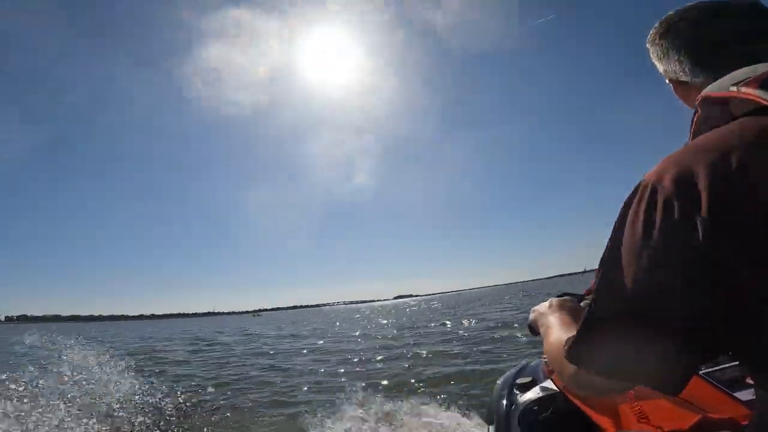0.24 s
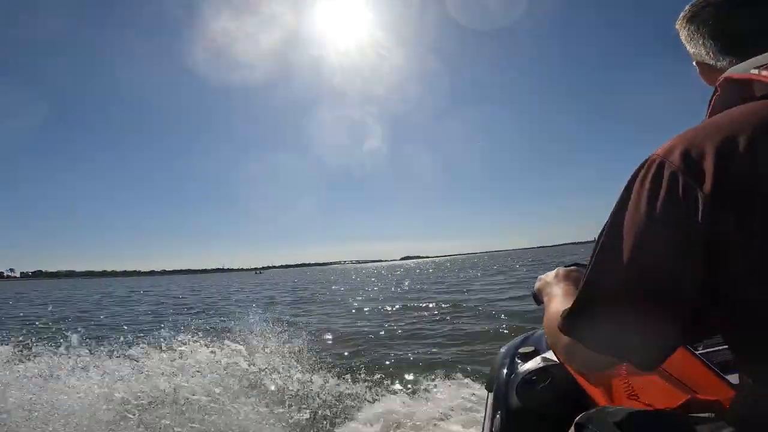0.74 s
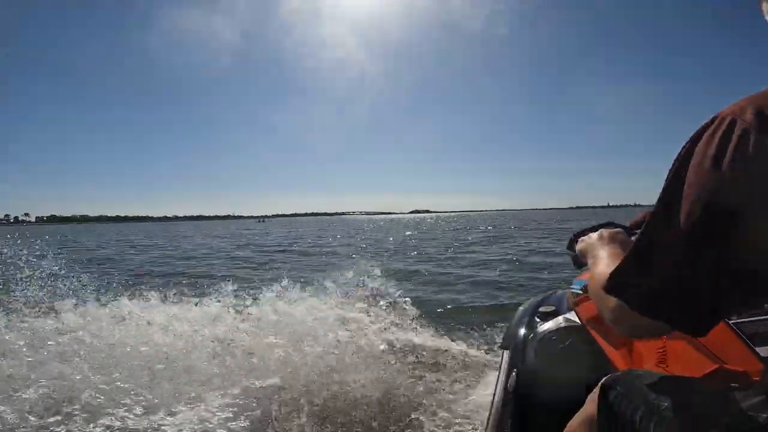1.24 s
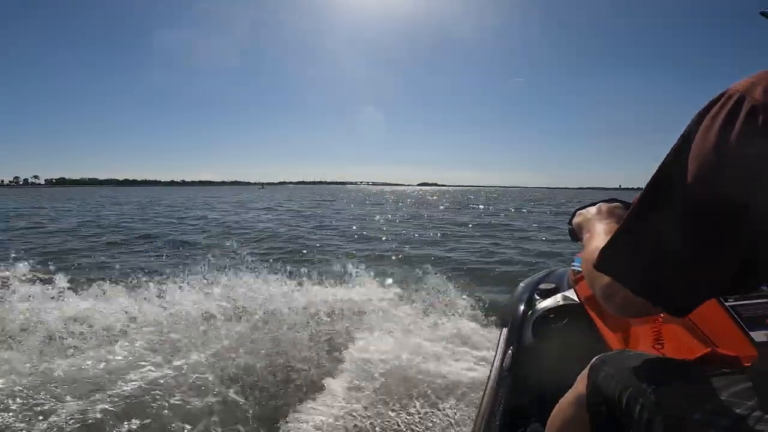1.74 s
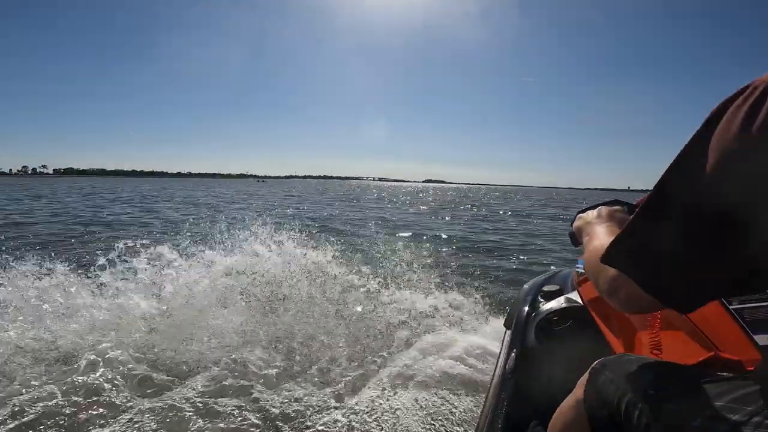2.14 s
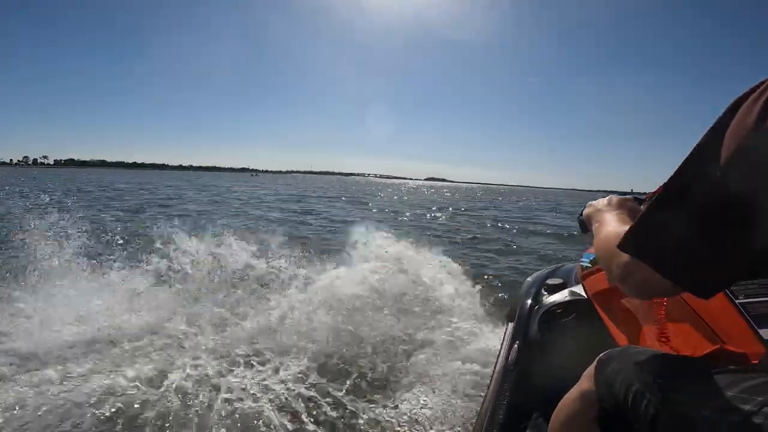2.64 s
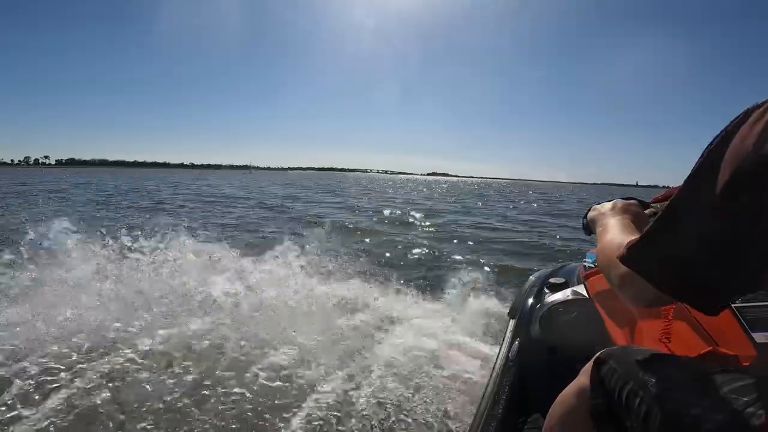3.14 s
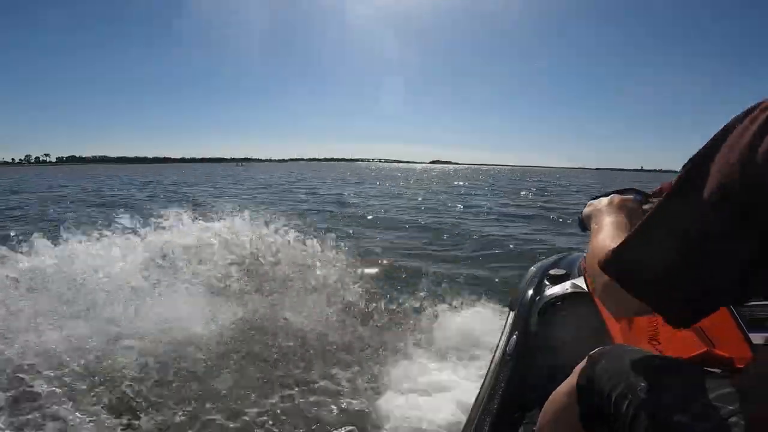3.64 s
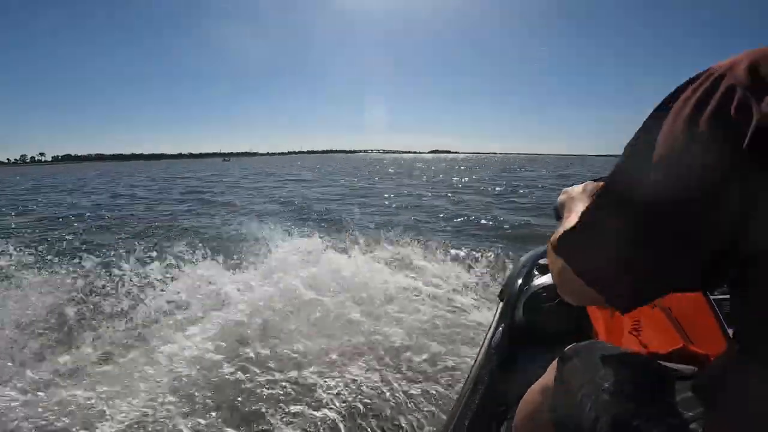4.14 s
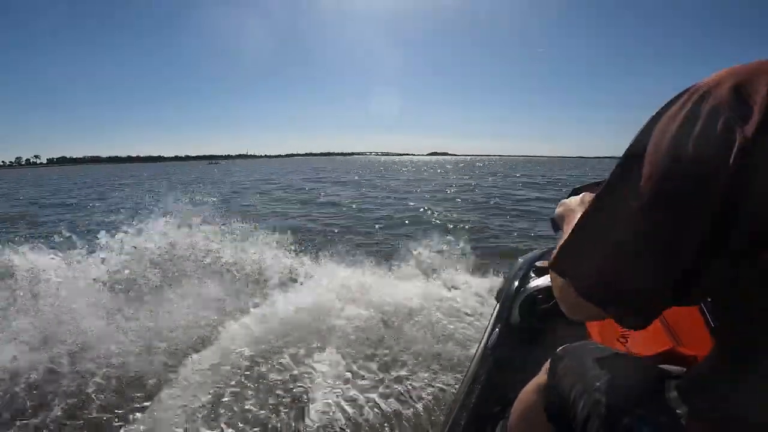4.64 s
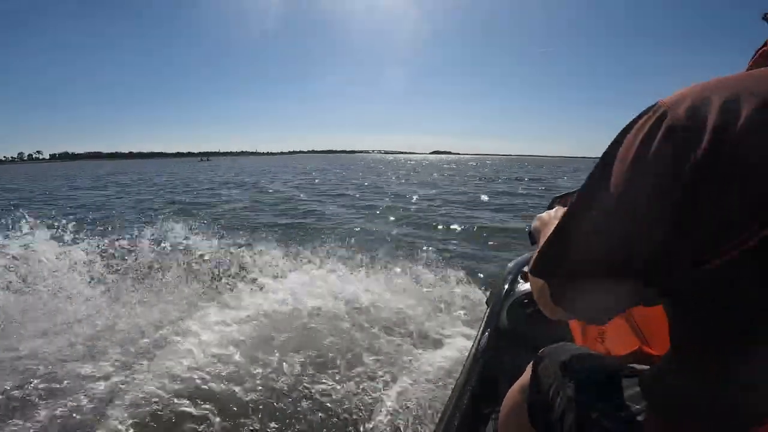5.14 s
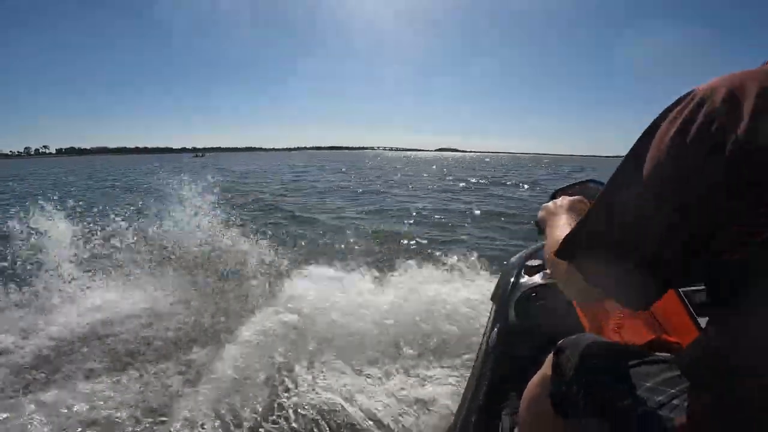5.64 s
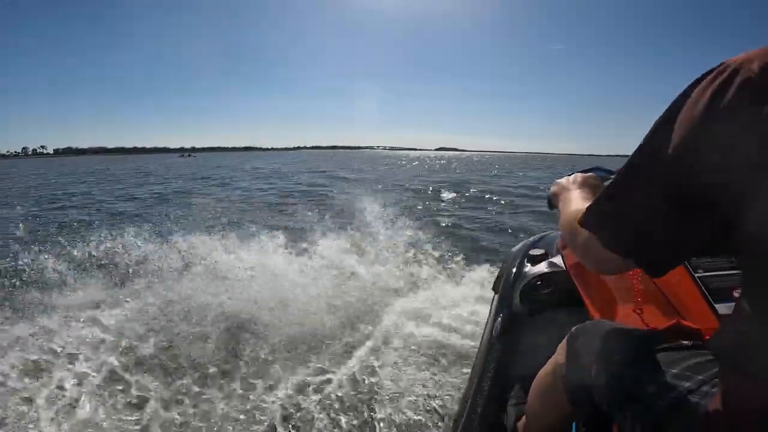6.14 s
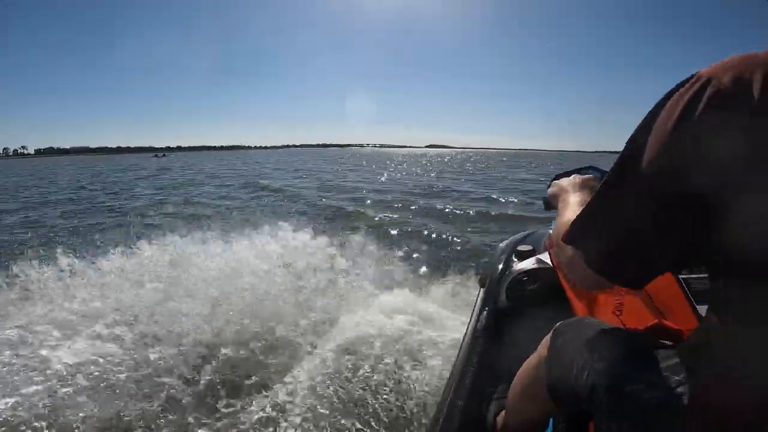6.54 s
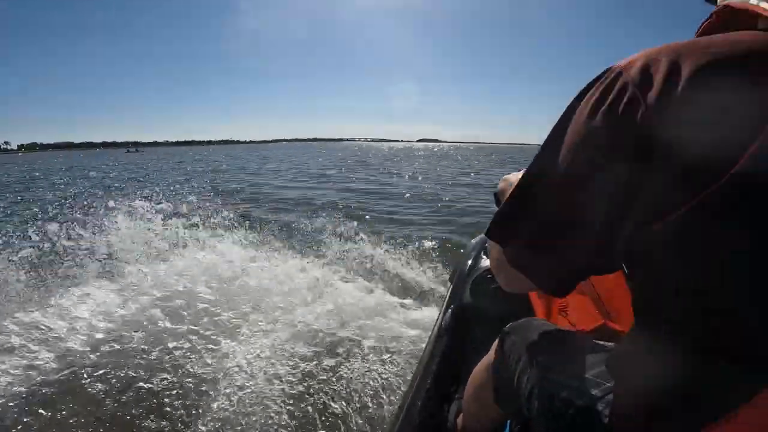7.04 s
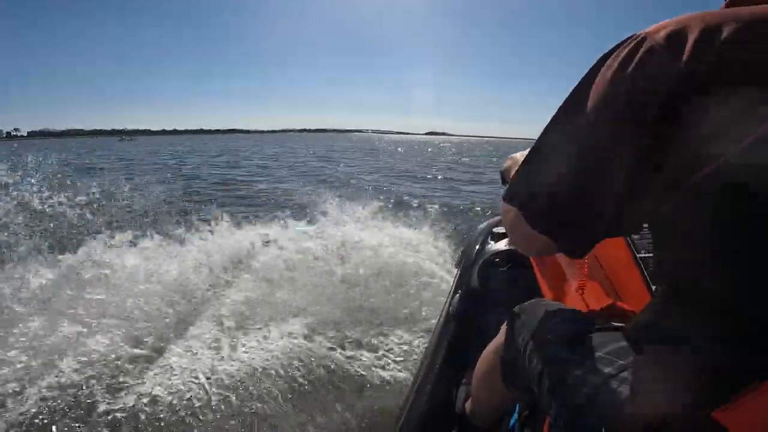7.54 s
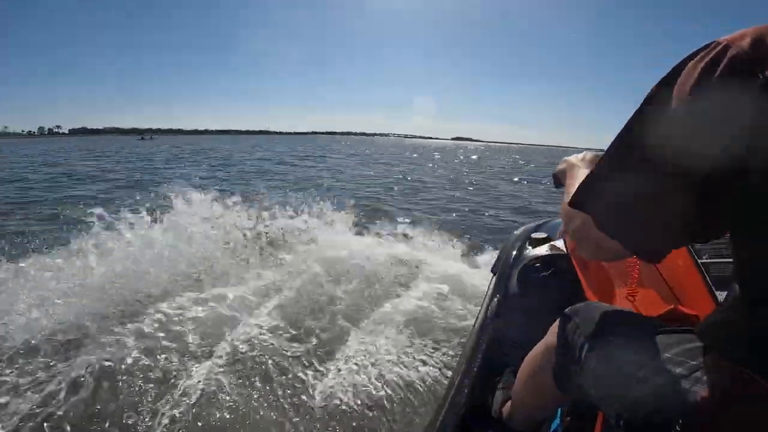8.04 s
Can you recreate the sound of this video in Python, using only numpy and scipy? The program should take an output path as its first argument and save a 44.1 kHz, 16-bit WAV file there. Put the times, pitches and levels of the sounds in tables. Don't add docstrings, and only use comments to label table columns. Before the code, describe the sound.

A small personal watercraft cruises across open water, heard from just behind the rider. A low, steady engine hum flutters and briefly chokes under waves. Wind buffets the microphone in heavy thumps with sudden ragged gusts, while hull panels drum against the chop and spray hisses and spatters close by. Gusts make everything else duck for a moment.

```python
import sys
import numpy as np
from scipy import signal
from scipy.fft import rfft, irfft, next_fast_len
from scipy.io import wavfile
from scipy.ndimage import uniform_filter1d, minimum_filter1d, map_coordinates

SR = 44100
rng = np.random.default_rng(int(sys.argv[2]) if len(sys.argv) > 2 else 0)


def how_loud(loudness_db):
    steps = np.asarray(loudness_db, float) / 20
    return 10 ** steps


def store_pcm(level_fs):
    pcm = np.round(np.clip(level_fs, -1, 1) * 32767).astype(np.int16)
    wavfile.write(sys.argv[1], SR, np.atleast_2d(pcm).T)


N = 365148

# [t/s, firing rate f/Hz, firing note level/dB, exhaust rasp level/dB]
ENGINE_RUN = [(.3, 145.8, -15.5, -2), (.62, 144.4, -18, -2.5), (.8, 139.9, -15.5, 0.5),
              (1.33, 139.7, -17, 1), (1.6, 143.3, -18, -10.5), (2.03, 141.4, -14, 2.5),
              (2.36, 145.2, -14.5, 1), (2.7, 146.8, -15.5, -9.5), (3.2, 147.2, -18, -3.5),
              (4.25, 143.2, -18, -6), (5.56, 144.6, -14.5, -4), (5.83, 148.3, -16.5, -6.5),
              (6.46, 149.3, -15, -7.5), (6.92, 137, -17, -2), (7.27, 136.8, -14, 4),
              (7.5, 145.5, -13.5, 3.5), (7.86, 140.2, -14.5, -1), (8.2, 138.1, -13, 5.5)]


def unit(x):
    return x / np.sqrt(np.mean(x ** 2) + 1e-20)


def along(points, hz):
    f, db = np.transpose(points)
    return np.interp(np.log(hz + 1), np.log(f + 1), db, left=-120, right=-120)


def curves(rows):
    s, *columns = np.transpose(rows)
    return [np.interp(np.arange(N) / SR, s, column) for column in columns]


def bumps(rows, half_s):
    s, *columns = np.transpose(rows)
    t = np.arange(0, N + 64, 64) / SR
    bells = np.exp(-((t[:, None] - s) / half_s) ** 2)
    return [np.interp(np.arange(N) / SR, t, bells @ column) for column in columns]


def wobble(rate):
    knots = rng.standard_normal(N // 50)
    return map_coordinates(knots, [np.arange(N) * rate / SR])


def filtered(x, response):
    m = next_fast_len(N + SR // 2)
    spectrum = rfft(x, m) * response(np.fft.rfftfreq(m, 1 / SR))
    return unit(irfft(spectrum, m)[:N])


def rush(spectrum, patchy_db, source=0):
    z = signal.stft(rng.standard_normal(N), nperseg=512)[2]
    patches = rng.standard_normal(z.shape)
    for axis in (0, 1):
        patches = uniform_filter1d(patches, size=8, axis=axis)
    noise = signal.istft(z * how_loud(patchy_db * unit(patches)), nperseg=512)[1][:N]
    return filtered(unit(noise) + source, lambda hz: how_loud(along(spectrum, hz)))


def engine():
    # [multiple, level/dB, share of rasp, share of booms, flutter/dB, phase wander/rad]
    overtones = [
        (3, -31.5, 1, 0.18, 2.5, 0.55),
        (2, -42.5, 0.26, 0.98, 2, 0.48),
    ]
    # [multiple of firing rate, level/dB, f/Hz, width/Hz]
    shaft_orders = [(1.5, -31.5, 220, 9), (2.5, -42.5, 362, 27), (3.5, -42.5, 506, 14), (4, -55, 575, 47),
                    (6, -41.5, 874, 24), (7.5, -54.5, 1080, 34)]
    # [t/s, level/dB]
    booms = [(.15, 8.5), (.85, 11.5), (1.5, 16.5), (3.25, 10), (4.2, 10), (4.6, 6.5), (5.9, 13), (6.3, 18),
             (6.8, 11.5), (7.65, 8), (8.02, 12)]
    # [t/s, depth/dB]
    dips = [(.07, 0), (.3, 26), (.71, 12), (.9, 8), (1.02, 1), (1.54, 16), (1.59, 3), (1.75, 4),
            (3.25, 11), (3.34, 16), (3.5, 6), (4.2, -2), (4.39, 25), (4.47, 6), (4.52, 7), (5.16, 12),
            (5.37, 4), (5.83, 4), (6.62, 2), (6.78, 4)]

    rate_hz, note_db, rasp_db = curves(ENGINE_RUN)
    boom_db, = bumps(booms, half_s=0.2)
    dip_db, = bumps(dips, half_s=0.0088)
    turn = 2 * np.pi * np.cumsum(rate_hz) / SR + 0.12 * wobble(25) + 0.27 * wobble(6)
    flutter = 0.53 * wobble(30) + 0.82 * wobble(9)
    lines = how_loud(note_db + 0.6 - dip_db + flutter) * np.sin(turn)

    for multiple, db, rasp_share, boom_share, flutter_db, wander in overtones:
        swing_db = rasp_share * rasp_db + boom_share * boom_db + flutter_db * wobble(22)
        lines += how_loud(db + swing_db) * np.sin(multiple * turn + wander * wobble(21))

    for multiple, db, peak_hz, width_hz in shaft_orders:
        resonance = 1 / np.hypot(1, 2 * (multiple * rate_hz - peak_hz) / width_hz)
        level = how_loud(db + 2.3 * wobble(13))
        lines += resonance * level * np.sin(multiple * turn + 0.4 * wobble(16))
    return np.sqrt(2) * lines


def wind():
    # [t/s, strength/dB, big eddies over small/dB]
    blow = [(0, -28.5, -0.5), (.3, -26.5, 0), (.6, -28, 2.5), (.8, -27, 1.5), (1.08, -29, -2),
            (1.35, -24.5, 0), (1.9, -27, 1.5), (2.3, -26.5, 1), (2.75, -25, 1.5), (3.3, -25.5, 0),
            (3.6, -26.5, 5), (4.3, -25.5, 0.5), (5.0, -26.5, 2), (5.5, -28.5, 0.5), (5.85, -24, 1.5),
            (6.1, -27, 2), (7.3, -26.5, -2.5), (8.28, -22.5, -4)]
    # [t/s, level/dB]
    thumps = [(.14, 7), (.39, 4.5), (.69, 8.5), (.94, 8.5), (1.07, -9.5), (1.47, 11), (1.75, 8),
              (1.87, -5.5), (2.07, 7), (2.93, 2), (3.25, 8.5), (3.34, 6), (3.74, 3), (4.29, 1.5),
              (4.55, 1.5), (4.91, 3), (5.19, 5.5), (5.49, -3.5), (5.68, 6), (5.83, 3), (6.16, -3),
              (6.64, 3), (6.99, 4.5), (7.08, -5), (7.12, 9.5), (7.31, -3), (7.79, -9), (8.07, 7.5),
              (8.16, 7)]
    # [f/Hz, level/dB]
    buffet_colour = [(2, -14), (6, -2), (16, 0), (30, -1), (60, -3), (110, -6), (150, -15.5), (250, -33)]
    # [f/Hz, level/dB]
    tearing_colour = [(90, -27.5), (130, 1.5), (255, -4.5), (340, -4), (500, -6.5), (1000, -12.5),
                      (1600, -21), (3000, -34), (6000, -62)]

    strength_db, big_db = curves(blow)
    gust_db = strength_db - strength_db.mean()
    thump_db, = bumps(thumps, half_s=0.024)
    eddies = wobble(22)

    buffet = unit(how_loud(2.0 * eddies) * rush(buffet_colour, patchy_db=-0.9))
    buffet_db = -21 + 0.75 * gust_db + big_db + thump_db

    ragged = how_loud(0.86 * eddies + 0.88 * wobble(90))
    tearing = unit(ragged * rush(tearing_colour, patchy_db=1.0))
    tearing_db = -26 + 0.95 * gust_db + 0.19 * thump_db
    return how_loud(buffet_db) * buffet + how_loud(tearing_db) * tearing


def puffs():
    # [t/s, level/dB, rise time/s, sharp edge 0-1]
    gusts = [(.122, -22, 0.0069, 0.7), (.214, -32, 0.021, 0.7), (.324, -28, .01, 0.4),
             (.748, -30, .0034, 1), (1.331, -30.5, 0.0063, .95), (1.441, -32, .004, .3),
             (1.493, -24.5, 0.0081, 1), (1.63, -27, .009, 0.4), (2.366, -33, 0.0092, 0.4),
             (2.417, -22.5, 0.0041, 0.69), (2.935, -25.5, 0.015, 0.2), (3.222, -19, 0.0064, 0),
             (3.334, -25, .0063, 0.6), (3.373, -28.5, 0.0085, 0.8), (3.832, -19.5, 0.0055, 0.7),
             (3.86, -24, .0059, 0.5), (4.05, -24.5, 0.0064, 0), (4.164, -28, .015, .1),
             (4.222, -26, 0.019, 0.77), (4.382, -24.5, 0.015, 0.9), (4.534, -24.5, .012, 0.4),
             (4.989, -26, 0.018, .1), (5.173, -26, .0065, 0.55), (5.434, -25.5, 0.006, 0),
             (5.659, -27, 0.014, 0.8), (5.758, -26, 0.011, 0), (5.871, -24, 0.0042, 0.7),
             (6.379, -18.5, 0.0064, 0.4), (6.81, -22.5, .0043, 0.4), (7.035, -24.5, .005, 0.4)]
    # [t/s, level/dB]
    flicks = [(.537, -33), (.699, -32), (.862, -31.5), (.897, -30.5), (.985, -30), (1.46, -25),
              (1.542, -33), (1.589, -31), (1.713, -32), (2.1, -27), (2.657, -34), (2.692, -30),
              (3.007, -31), (3.565, -33), (3.662, -32.5), (3.99, -26), (4.125, -34), (4.29, -27),
              (4.59, -34), (4.709, -28.5), (4.853, -25.5), (5.381, -31), (5.947, -24.5), (5.996, -27),
              (6.723, -23), (6.833, -26), (6.868, -25.5), (7.44, -24.5), (7.512, -30), (8.026, -22.5)]
    # [f/Hz, level/dB]
    dull_colour = [(150, -30.5), (300, 0), (600, -5), (1000, -10), (1600, -22.5), (3000, -43.5)]
    # [f/Hz, level/dB]
    sharp_colour = [(600, -27), (1100, 3), (1700, 2), (2800, -9), (5000, -23), (9000, -52.5)]

    dull, sharp = np.zeros(N + SR), np.zeros(N + SR)
    t = np.arange(SR // 5) / SR
    lead = 3
    lesser = [(s, db, 0.006, 0.36) for s, db in flicks]
    for s, db, rise_s, edge in [*gusts, *lesser]:
        rip = how_loud(db + 2.5) * np.exp(-np.abs(t / rise_s - lead) ** 1.34)
        start = round((s - lead * rise_s) * SR)
        dull[start:][:len(t)] += rip
        sharp[start:][:len(t)] += edge * rip

    ragged = how_loud(1.6 * wobble(300))
    body = how_loud(3.5) * dull[:N] * rush(dull_colour, patchy_db=-1.1)
    edges = how_loud(-3) * sharp[:N] * rush(sharp_colour, patchy_db=2.0)
    return ragged * (body + edges)


def water():
    # [t/s, spray level/dB, fine drops over coarse/dB]
    wash = [(0, -43, 0.5), (.3, -41, 0), (.55, -44, 3), (.85, -40, 0), (1.1, -45, 2), (1.45, -39, -2.5),
            (1.85, -42.5, 1), (2.4, -40, 2), (3.15, -39, 0), (3.55, -42, 0), (4.1, -40.5, 0.5),
            (4.55, -37.5, -2), (4.9, -40, 0), (5.8, -34.5, -1.5), (6.15, -36, 2), (6.7, -37.5, -2),
            (7.3, -38.5, -1.5), (8.0, -35.5, 0)]
    # [t/s, spray level/dB, fine drops level/dB]
    sheets = [(.12, 4.5, 2), (.3, 1.5, -1.5), (.73, 4, 0.5), (.96, 1.5, 2), (1.02, -3, -3.5),
              (1.28, 2, 0.5), (1.48, 2, 2.5), (1.53, -7, -1.5), (1.6, 4.5, 2), (1.67, -4, -4), (1.72, 4, 1),
              (2.22, 2.5, -0.5), (2.93, 3, -2.5), (3.18, 4, -1), (3.27, 1, -2.5), (3.36, 1.5, -1.5),
              (3.78, 7, 2), (4.04, 1.5, 3.5), (4.24, -1.5, 0), (4.41, -1, -3), (4.48, 2, 4), (5.01, 4, 7.5),
              (5.14, 2, 1), (5.72, 1, -0.5), (6.4, -0.5, -1.5), (6.55, -0.5, 2), (6.73, 0, 1.5),
              (6.9, 0, 0), (7.2, 3.5, 2), (7.95, 1, 2)]
    # [f/Hz, level/dB]
    spray_colour = [(400, -24), (900, -15.5), (1500, -1.5), (2200, -3.5), (3200, -5.5), (4500, -13.5),
                    (6000, -29), (8000, -42.5)]
    # [f/Hz, level/dB]
    fizz_colour = [(2500, -18), (4200, -4.5), (5200, -5), (6300, -10), (7500, -9.5), (9000, -14.5),
                   (11000, -16), (12500, -22), (13500, -34), (15500, -41)]

    spray_db, fine_db = curves(wash)
    thrown_db, drops_db = bumps(sheets, half_s=0.045)
    fizz_db = -48.5 + 0.43 * (spray_db - spray_db.mean()) + fine_db + drops_db

    drop_at = rng.integers(N, size=12000)
    spatter = unit(np.bincount(drop_at, rng.laplace(size=len(drop_at)), N))
    surge = wobble(18)
    spray_swell = how_loud(0.5 * surge + 0.74 * wobble(60))
    spray = unit(spray_swell * rush(spray_colour, patchy_db=0.9, source=0.3 * spatter))
    fizz_swell = how_loud(0.31 * surge + 0.25 * wobble(17))
    fizz = unit(fizz_swell * rush(fizz_colour, patchy_db=0.9, source=0.34 * spatter))
    return how_loud(spray_db + thrown_db + 1.5) * spray + how_loud(fizz_db) * fizz


def hull():
    # [f/Hz, width/Hz, level/dB]
    panels = [(158, 7.1, 0.5), (185.6, 42, 6), (220.7, 20, 3.5), (313, 39, -16.5), (407, 85, -8.5)]
    # [t/s, drumming level/dB]
    slaps = [(.28, 2), (.39, -6.5), (.69, 6.5), (.9, 4), (1.11, 1.5), (1.47, 5.5), (1.53, -4), (1.66, 3.5),
             (2.07, 0), (2.58, 5.5), (2.75, 0.5), (3.09, 3), (3.5, -7), (3.74, 1.5), (3.83, -4.5),
             (4.22, 8.5), (4.4, 6.5), (4.54, 7.5), (5.1, 2), (5.35, 5), (5.49, -1.5), (5.67, 7),
             (5.83, 3.5), (6.2, -0.5), (6.46, 6), (6.73, 8), (7.36, -2), (7.79, -10), (8.02, 5.5),
             (8.21, -9.5)]

    def ringing(f):
        total = sum(how_loud(db) * f * width / np.abs(centre * centre - f * f + 1j * f * width)
                    for centre, width, db in panels)
        return total ** 1.78

    slap_db, = bumps(slaps, half_s=0.055)
    rate_hz = curves(ENGINE_RUN)[0]
    drum_db = -23 + 0.28 * (rate_hz - 143.4) + slap_db
    drum = unit(how_loud(1.6 * wobble(20)) * filtered(rng.standard_normal(N), ringing))
    return how_loud(drum_db) * drum


def scene():
    return (engine() + wind() + puffs() + water() + hull())[None]


def low_pass(x):
    return signal.sosfilt(signal.butter(12, 14330, fs=SR, output="sos"), x)


def record(dry):
    # [f/Hz, level/dB]
    treble_rolloff = [(1, 0), (6500, 0), (9000, -3), (11000, -9), (13000, -13), (16000, -17), (22050, -40)]

    needed = np.minimum(1, 0.4 / (np.abs(dry) + 1e-9)) ** 0.62
    gain = minimum_filter1d(needed, size=700, axis=1)
    for _ in range(2):
        gain = uniform_filter1d(gain, size=300, axis=1)
    x = how_loud(0.2) * dry[0] * gain[0]
    x = x / (1 + np.abs(x / 0.64) ** 6) ** (1 / 6)
    dulled = x.std() * filtered(x, lambda hz: how_loud(along(treble_rolloff, hz + 1)))
    mix = dulled - 0.0039
    return low_pass(mix[None])


dry = scene()
out = record(dry)
store_pcm(out)
```